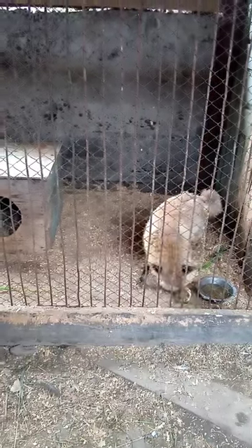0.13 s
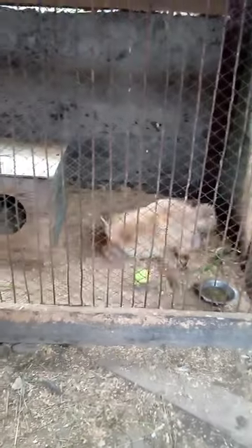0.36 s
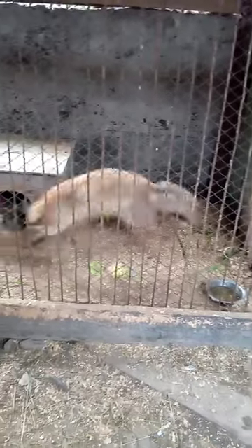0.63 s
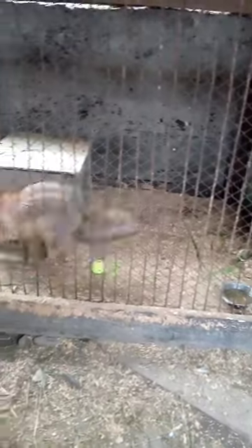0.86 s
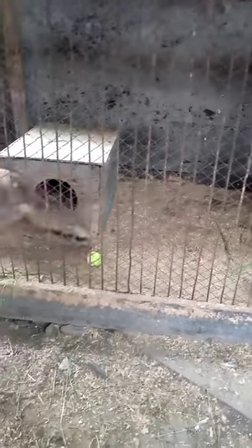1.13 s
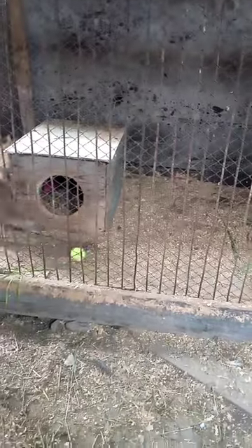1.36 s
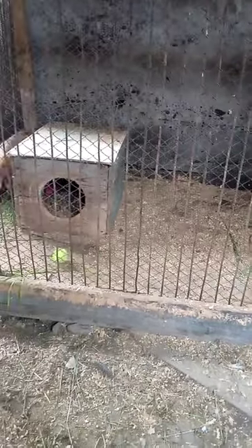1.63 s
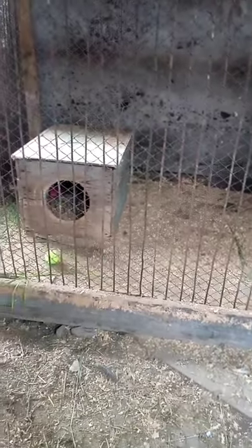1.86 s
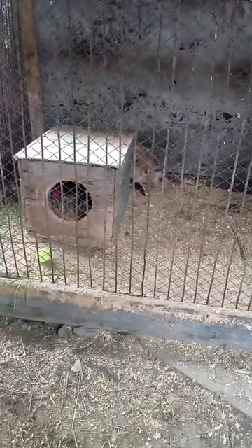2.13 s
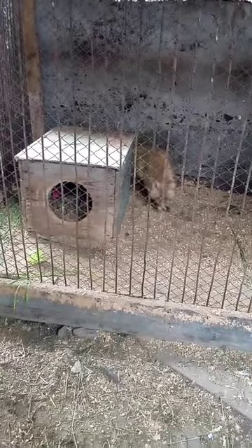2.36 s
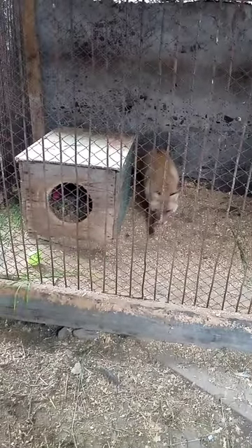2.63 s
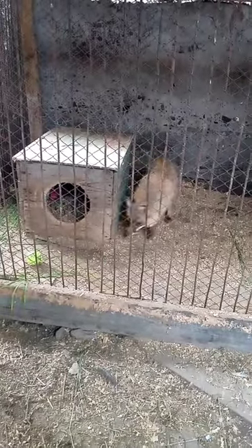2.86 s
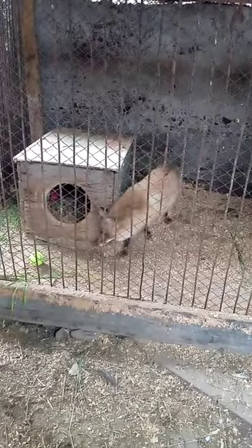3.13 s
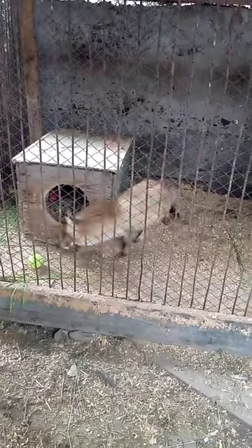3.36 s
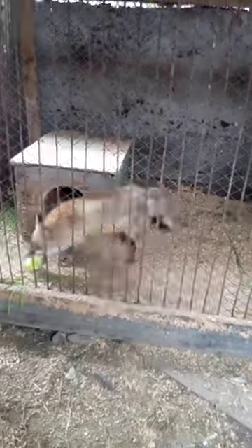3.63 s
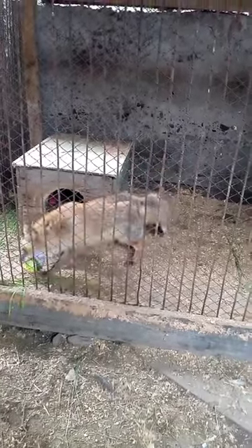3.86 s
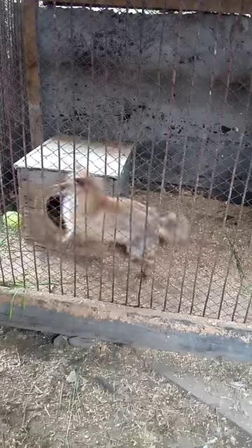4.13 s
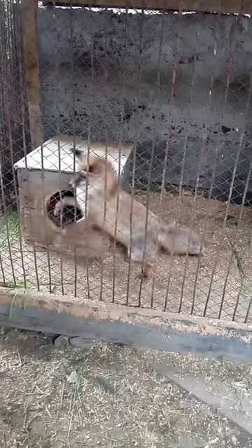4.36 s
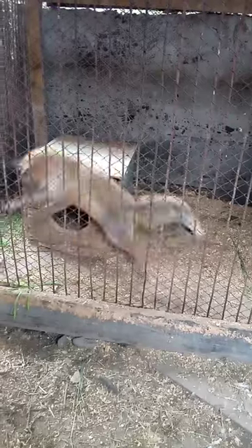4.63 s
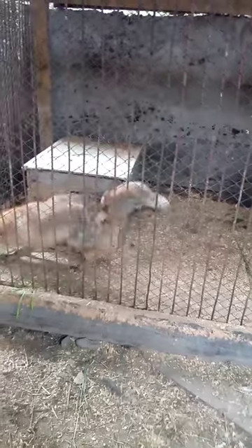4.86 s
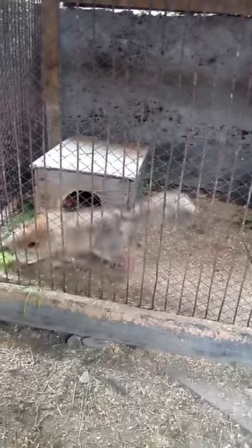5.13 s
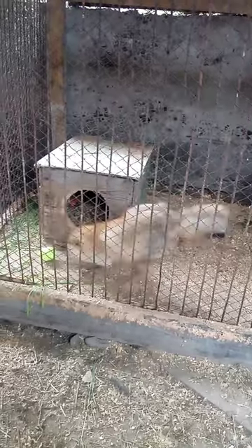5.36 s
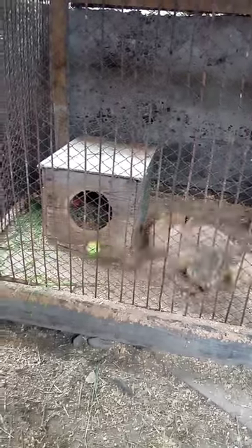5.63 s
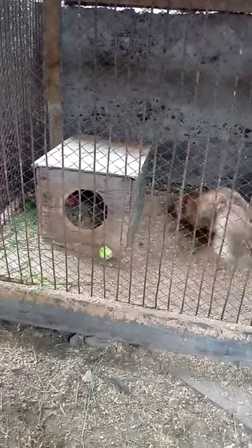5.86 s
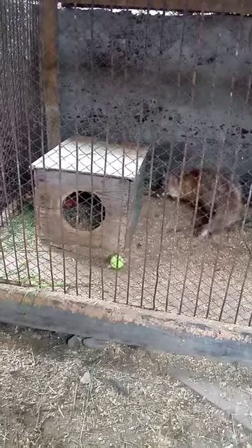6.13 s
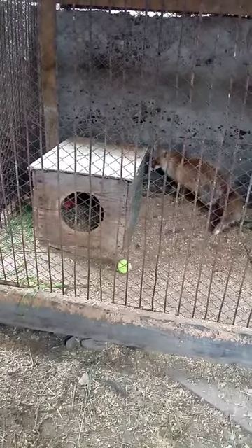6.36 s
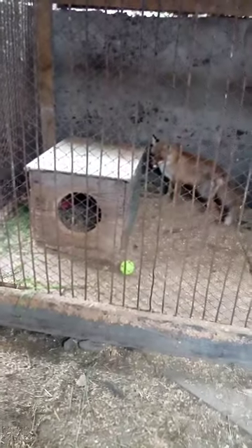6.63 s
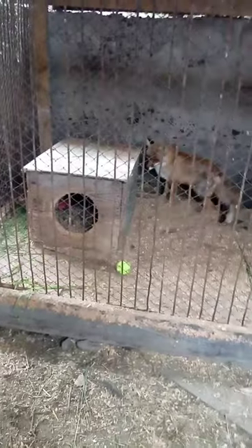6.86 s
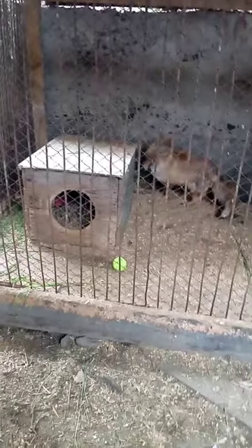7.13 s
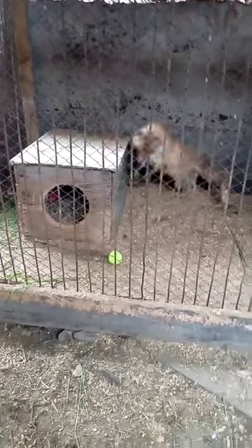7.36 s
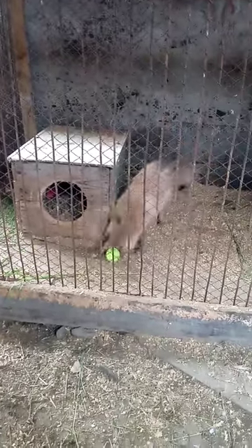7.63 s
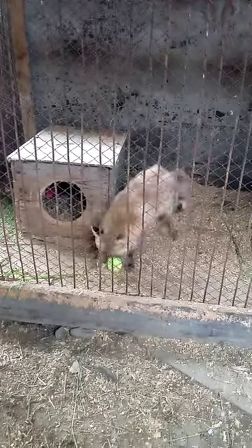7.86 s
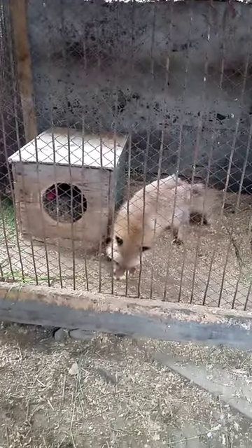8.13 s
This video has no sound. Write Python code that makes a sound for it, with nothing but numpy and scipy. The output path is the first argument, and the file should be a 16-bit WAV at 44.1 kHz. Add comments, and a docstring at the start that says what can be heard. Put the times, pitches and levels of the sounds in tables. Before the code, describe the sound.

Irregular flurries of padded paw thuds, crisp claw scrapes and cracking straw as a fox bats a small ball about its wire pen.

```python
"""Fox pouncing on a hollow floor

A fox scuffles and pounces in a wire pen floored with straw-strewn planks, batting a small ball.
Landings and sliding paws ring plank modes; claw strokes shape grains of straw and grit, which ring the wire.
Knocks ring the ball's modes, stalks crack in clicks, and one faint squeak is a rough, sagging sine.
Short feedback delays make the pen; noise makes a faint hiss, and a narrow noise-fed resonance the hum."""
import sys
import numpy as np
from scipy import signal
from scipy.fft import rfft, irfft
from scipy.io import wavfile

SR = 44100
rng = np.random.default_rng(int(sys.argv[2]) if len(sys.argv) > 2 else 0)


def put_to_file(sound):
    """Save the sound as 16-bit audio at rate SR, in the file named by the first command-line argument."""
    columns = np.atleast_2d(sound).T  # one column per channel
    safe = np.clip(columns, -1, 1)
    whole_steps = np.round(safe * 32767)
    wavfile.write(sys.argv[1], SR, whole_steps.astype(np.int16))


def undo_db(level):
    """Turn decibels back into plain size, where 20 dB means ten times bigger."""
    steps = np.asarray(level, float) / 20
    return 10 ** steps


N = 363825   # samples

# where the claws work: (t/s, lean to the left/dB, of which placed() applies half as left-right difference)
PLACE = [(.3, -17), (.75, 10), (1, 1), (1.2, 4), (2.2, 2), (4.5, 8.5), (5.2, 0), (5.45, -0.5), (6.1, 2.5),
         (7.28, -5), (7.6, 5)]


def rms_one(x):
    """Scale to rms 1."""
    return x / np.sqrt(np.mean(x ** 2) + 1e-20)


def at_bins(points):
    """Read a (f/Hz, value) table at every frequency bin, along log frequency."""
    hz = np.maximum(np.arange(N // 2 + 1) * SR / N, 1)
    table_hz, values = np.array(points).T
    return np.interp(np.log(hz), np.log(table_hz), values)


def colour(x, spectrum):
    """Shape by a spectrum in dB whose overall gain on white noise is 1."""
    return irfft(rfft(x) * rms_one(undo_db(at_bins(spectrum))), N)


def ring(push, hz, t60):
    """Two-pole resonator: a unit click sets a sine ringing from height 1."""
    radius = undo_db(-60 / (t60 * SR))
    turn = 2 * np.pi * hz / SR
    return signal.lfilter([0, np.sin(turn)], [1, -2 * radius * np.cos(turn), radius ** 2], push + 1e-18)


def flicker(rate, count):
    """Slow chance curves: straight lines between normal knots of spread 1, rate of them a second."""
    knots = rng.standard_normal((count, int(N / SR * rate) + 2))
    clock = np.arange(N) / SR * rate
    return np.array([np.interp(clock, np.arange(len(k)), k) for k in knots])


def grains(per_s, spread_db, smooth):
    """Random clicks of uneven size on a smooth rub; both ears share a part."""
    unevenness = np.minimum(rng.exponential(1, (3, N)), 3.5)
    sizes = undo_db(spread_db * unevenness) * rng.standard_normal((3, N))
    clicks = rms_one(sizes * (rng.random((3, N)) < per_s / SR))
    rub = clicks + smooth * rng.standard_normal((3, N))
    return rms_one(rub[0] + 1.2 * rub[1:])


def placed(s, db):
    """Left and right gains of a claw sound at time s, leaning to where the claws work."""
    return undo_db(db + np.interp(s, *np.transpose(PLACE)) * np.array([[.25], [-.25]]))


def background():
    """Gently swelling hiss, nearly independent at the two ears, and noise through a narrow mode as hum."""
    # hiss spectrum: (f/Hz, level per Hz/dB)
    hiss_colour = [(30, -5), (70, -4.5), (115, -6), (174, -13), (300, -12.5), (460, -16), (700, -17),
                   (1200, -22), (1600, -21.5), (2500, -22), (4000, -23.5), (6300, -26), (10000, -26),
                   (16000, -31.5)]
    # left-right likeness of the hiss: (f/Hz, correlation)
    likeness = [(60, 0.048), (1650, 0.016), (4970, 0.12), (15000, .02)]
    # hum: (f/Hz, width/Hz, level/dB)
    hum_mode = (144, 12.4, -63)
    mid, side = rfft(rng.standard_normal((2, N)))
    alike = np.clip(at_bins(likeness), 0, 1)
    pair = np.sqrt(1 + alike) * mid + np.sqrt(1 - alike) * side * [[1], [-1]]
    hiss = rms_one(colour(irfft(pair, N), hiss_colour))
    swell = undo_db(0.73 * flicker(rate=2.916, count=1))
    hz, width_hz, hum_db = hum_mode
    hum = ring(rng.standard_normal(N), hz, np.log(1000) / np.pi / width_hz)
    return undo_db(-56.5) * hiss * swell + undo_db(hum_db) * rms_one(hum)


def slides():
    """Paws slide under load: each sets in, holds and lets go. Returns plank, straw and grit drive in dB."""
    # slides: (t/s, length/s, weight on planks level/dB, straw dragged level/dB, grit scraped level/dB)
    slide_list = [(0.388, 0.027, -39.5, -66, -52.5), (0.527, 0.038, -45, -51.5, -88),
                  (0.7, 0.026, -36.5, -48, -38.5), (0.753, 0.031, -35.5, -49, -50.5),
                  (0.901, 0.026, -32, -62, -51.5), (0.975, 0.013, -30, -35, -34),
                  (1.074, 0.23, -47.5, -74, -50.5), (1.209, 0.036, -48, -43.5, -40.5),
                  (1.297, 0.072, -36.5, -47.5, -45), (1.454, 0.021, -48, -69, -54.5),
                  (1.702, 0.14, -56, -59, -55.5), (2.132, 0.07, -53, -70, -61),
                  (2.15, 0.022, -28.5, -49, -62), (2.21, 0.11, -46.5, -56, -52),
                  (4.097, 0.047, -51, -60, -50), (4.402, 0.047, -60, -43, -45.5),
                  (4.47, 0.2, -54, -74, -48.5), (4.707, 0.14, -42, -44.5, -57),
                  (4.775, 0.12, -31, -40.5, -38.5), (4.906, 0.084, -42, -48, -49),
                  (5.038, 0.062, -46, -72, -50), (5.083, 0.029, -28, -51, -50),
                  (5.133, 0.074, -50, -39.5, -42), (5.227, 0.12, -60, -46.5, -45.5),
                  (5.353, 0.11, -41, -44.5, -39), (5.435, 0.16, -33, -37.5, -40),
                  (5.562, 0.077, -41, -45, -43.5), (5.628, 0.088, -45, -49, -43.5),
                  (5.71, 0.058, -51, -46.5, -45), (5.801, 0.054, -30.5, -37.5, -46),
                  (5.905, 0.067, -42, -59, -52), (5.957, 0.06, -35.5, -51, -60),
                  (6.082, 0.059, -36, -65, -69), (6.15, 0.23, -54.5, -66, -70), (7.287, 0.2, -70, -64, -68),
                  (7.606, 0.066, -27, -51.5, -67), (7.894, 0.045, -55, -71, -62.5)]
    # swing of the stirring: planks/dB, straw/dB, grit/dB
    stir_swing_db = (2.5, 3.5, 3.5)
    attack_s, release_db_per_s = 0.02, 274
    t = np.arange(N // 32 + 2) * 32 / SR   # a coarse clock is enough
    swing = np.pad(flicker(rate=11.0, count=3)[:, ::32], ((0, 0), (0, 1)), "edge")[:, :len(t)]
    # faint, uneven stirring between the moves
    stir_db = np.array([[-67], [-64.5], [-66]]) + np.array(stir_swing_db)[:, None] * swing
    power = undo_db(2 * stir_db)
    for s, length, *levels_db in slide_list:
        attack = np.clip((t - s) / attack_s, 0, 1) ** 2
        release = undo_db(-release_db_per_s * np.maximum(t - s - length, 0))
        power += (undo_db(levels_db)[:, None] * attack * release) ** 2
    return [np.interp(np.arange(N) / SR, t, 10 * np.log10(p)) for p in power]


def planks(weight_db):
    """A padded landing presses unevenly for a moment; plank modes near the spot's pitch ring most."""
    # paws landing: (t/s, level/dB, favoured pitch f/Hz, dying time constant of the press/s)
    thuds = [(0.308, -46.5, 117, 0.067), (0.424, -25.5, 135, 0.03), (0.435, -42.5, 298, .02),
             (0.543, -33.5, 133, 0.044), (0.553, -39, 294, 0.019), (0.735, -36.5, 147, 0.017),
             (0.77, -26, 134, 0.018), (0.914, -39, 148, 0.017), (1.194, -42.5, 224, 0.043),
             (1.233, -35.5, 214, 0.019), (1.303, -28, 201, 0.038), (1.477, -42.5, 183, 0.017),
             (1.679, -47.5, 222, 0.031), (1.746, -43.5, 131, 0.042), (1.896, -36.5, 210, 0.019),
             (2.109, -35.5, 172, 0.01), (2.179, -32, 158, 0.011), (2.192, -40.5, 320, 0.051),
             (2.29, -59, 88.8, 0.017), (2.381, -47, 105, 0.039), (2.582, -49.5, 121, 0.02),
             (2.664, -48.5, 110, 0.027), (3.56, -52, 142, 0.016), (4.098, -44, 248, 0.029),
             (4.128, -34, 98, 0.028), (4.229, -47.5, 102, 0.017), (4.428, -27.5, 144, 0.077),
             (4.704, -25, 124, 0.054), (4.799, -31.5, 215, 0.049), (4.808, -37, 372, 0.007),
             (4.866, -31, 195, 0.015), (4.906, -26, 127, 0.036), (5.083, -37.5, 215, 0.068),
             (5.275, -43.5, 172, 0.11), (5.455, -34.5, 135, 0.031), (5.571, -32.5, 172, 0.044),
             (5.71, -29.5, 179, 0.051), (5.782, -34.5, 286, 0.068), (5.971, -32.5, 278, 0.014),
             (6.072, -33, 202, 0.021), (7.338, -49, 98, 0.049), (7.603, -26, 171, 0.046),
             (7.911, -40.5, 120, 0.045), (7.989, -45.5, 109, 0.019), (8.199, -51, 117, 0.031)]
    # plank modes: (f/Hz, level/dB, t60/s)
    plank_modes = [(61, -11, 0.54), (85.3, -4, 0.64), (110, 0, 0.37), (135, 0, 0.33), (151.9, -0.5, 0.24),
                   (172, -0.5, 0.26), (204.2, 3, 0.16), (231.5, 0.5, 0.12), (274, 1, 0.13),
                   (302.5, 1.5, 0.13), (339, 2, 0.13), (381.3, -3, 0.14), (444, -42, 0.42),
                   (508.5, -7, 0.17), (680, -8.5, 0.083)]
    focus_db = 13   # modes an octave off the spot's pitch are this much weaker
    out = np.zeros(N)
    jolts = rng.choice([-1, 1], (len(thuds), 40 + len(plank_modes)))
    shuffle = undo_db(weight_db - 47.5) * rng.standard_normal(N)
    lag = np.arange(40) * .0037   # s between jolts of one landing
    for k, (hz, level_db, t60) in enumerate(plank_modes):
        push = shuffle * undo_db(level_db)
        for (s, db, spot_hz, press), jolt in zip(thuds, jolts):
            at = np.minimum(((s + lag) * SR).astype(int), N - 1)
            strength = np.where(lag > 0, 0.46 * jolt[:40], 0.75) * np.exp(-lag / max(press, .002))
            strength = strength * jolt[40 + k]   # each spot starts a mode up or down
            off_pitch = np.log2(hz / spot_hz) ** 2
            push[at] += strength * undo_db(db + level_db - 8.0 - focus_db * off_pitch)
        out += ring(push, hz, t60)
    soft_pads = signal.butter(2, 800.0, fs=SR, output="sos")
    return signal.sosfilt(soft_pads, out)


def stroke(s, db, dying):
    """A claw bites, then drags: its span, clock, first bite and dying drag, the last two at both ears."""
    at = round(s * SR)
    t = np.arange(min(SR // 3, N - at)) / SR
    side = placed(s, db - 14.0)
    t60 = max(dying, .01)
    bite = 1.9 * (0.071 / t60) ** 0.21   # the shorter the stroke, the harder its first bite
    snap = bite * undo_db(-60 * t / 0.023) * (1 - np.exp(-t / 0.00085))
    drag = undo_db(-60 * t / t60) * (1 - np.exp(-t / 0.025 / t60))   # swells over a share of its dying time
    return slice(at, at + len(t)), t, side * snap, side * drag


def claws(straw_db, grit_db):
    """Claw strokes shape straw and banded grit in their own colours; dragging fills gaps; grit rings wire."""
    # claw strokes: (t/s, level/dB, dull part relative level/dB, grain pitch f/Hz, dying time t60/s)
    rakes = [(0.3006, -42.5, 8, 1550, 0.054), (0.5464, -49, -5, 1720, 0.074),
             (.7196, -49.5, -21, 2250, 0.022), (0.775, -37, -20, 2450, 0.051),
             (.9237, -37.5, -17, 3300, 0.091), (0.956, -37.5, -6, 3340, 0.2),
             (0.981, -31.5, -22, 1870, 0.02), (1.065, -36, -20, 3400, 0.055), (1.101, -44, -6, 2130, 0.074),
             (1.202, -31.5, -27, 2970, 0.044), (1.222, -31.5, -17, 2920, 0.09),
             (1.282, -31, -23, 3030, 0.15), (1.295, -25.5, -5, 2950, 0.035), (1.8936, -49, -9, 3220, 0.11),
             (2.172, -35, -3.5, 2370, 0.28), (2.2883, -45.5, 9, 1800, 0.13), (2.7, -54, -21, 2000, .12),
             (4.0545, -40.5, -5, 2960, 0.26), (4.0984, -50, -17, 3620, 0.2),
             (4.427, -35.5, -6, 5750, 0.038), (4.513, -40.5, 6, 2830, 0.58), (4.555, -24, -36, 5040, 0.1),
             (4.7015, -30, -27, 5960, 0.0083), (4.785, -32, -4, 3120, 0.043),
             (4.8, -24.5, -12, 2400, 0.012), (4.8638, -25, -4, 3620, 0.077), (5.089, -29, 3, 2800, 0.13),
             (5.153, -23.5, -19, 2780, 0.044), (5.263, -33.5, -6, 2940, 0.085),
             (5.346, -31.5, -16, 3520, 0.31), (5.371, -30, -27, 3120, 0.063), (5.4298, -23, -33, 2170, 0.1),
             (5.441, -32, -27, 4400, .04), (5.4582, -36, -3, 3120, 0.054), (5.488, -22.5, -2, 1890, 0.054),
             (5.506, -30, -1, 5100, 0.035), (5.524, -31, 3, 1980, 0.032), (5.552, -28.5, -17, 2900, 0.14),
             (5.562, -23, -17, 2500, 0.061), (5.595, -36, -9, 3230, 0.11), (5.7394, -33.5, -12, 2960, 0.16),
             (5.775, -30.5, -11, 2800, 0.22), (5.795, -26.5, -11, 1690, 0.18), (5.82, -39, -12, 2210, .05),
             (5.829, -40, -6, 1550, 0.29), (5.968, -43.5, 0, 3140, 0.19), (6.0695, -29, 0, 3570, 0.23),
             (6.1, -33.5, -1, 3400, 0.053), (6.3, -49, -15, 3300, 0.17), (7.178, -43, -15, 1900, 0.21),
             (7.278, -36.5, -6.5, 6100, 0.13), (7.602, -34, -2, 2000, 0.64),
             (7.628, -47.5, -10, 5000, 0.13)]
    # fine grit kicked up, a bright spray: (t/s, level/dB, dying time t60/s)
    sprays = [(0.719, -43, 0.092), (.9815, -46.5, 0.15), (1.282, -42, 0.068), (1.296, -41, .045),
              (4.8646, -38, 0.06), (5.349, -44.5, 0.43), (5.4294, -50, 0.18), (5.555, -53, 0.47),
              (5.7813, -49, .2), (7.28, -44, 0.06)]
    # centres of the overlapping grit bands: f/Hz
    bands_hz = [1400, 2100, 3200, 4800, 7200, 11000]
    # grit spectrum: (f/Hz, level per Hz/dB)
    grit_colour = [(900, -10), (1300, -44), (1500, 0), (2050, 1), (2400, 0), (2900, 2), (3350, 6.5),
                   (3900, 3.5), (4600, 1.5), (5100, -2), (5700, 7.5), (6600, 2), (8000, -1), (10000, -17.5),
                   (13000, -19), (15000, -27)]
    # straw spectrum: (f/Hz, level per Hz/dB)
    straw_colour = [(250, -1.5), (400, 2), (600, 2), (845, -1), (950, -1.5), (1130, -0.5), (1400, -10),
                    (2000, -10), (3000, -29.5)]
    # stereo lean of the grit: (f/Hz, left-right/dB)
    grit_lean = [(60, -2), (150, -7), (380, 12), (950, -3), (2380, 9), (5980, 5.5), (15000, -10)]
    # wire mesh peppered by grit: (f/Hz, level/dB, t60/s)
    wire_modes = [(1759, -38, 0.015), (2097, -36.5, 0.012), (2495, -35, 0.01), (2940, -33, 0.014),
                  (3347, -35.5, 0.011), (5740, -40, .01)]
    top_gain = undo_db(31.5)   # the top band is weak in grit and microphone, so it is driven harder
    sheen = undo_db(-41)       # share of every stroke that reaches the top band
    centres = np.array(bands_hz)[:, None, None]
    patches = undo_db(4.9 * flicker(rate=60, count=len(bands_hz) + 1))[:, None]
    bright = undo_db([grit_db - 9.5] * 2) * patches[1:]
    dull = undo_db([straw_db - 7.5] * 2) * patches[0]
    strokes, ticks = np.array(rakes), np.zeros((2, N))
    # dragging keeps the colour of the strokes around it
    drag_hz = np.interp(np.arange(N) / SR, strokes[:, 0], strokes[:, 3])
    bright *= undo_db(2 - 2 * np.log2(centres / drag_hz) ** 2)
    for s, db, dying in sprays:
        span, t, snap, drag = stroke(s, db, dying)
        bright[-1, :, span] += (0.23 * snap + drag) * top_gain
    for s, db, dull_db, grain_hz, dying in rakes:
        span, t, snap, drag = stroke(s, db, dying)
        off_pitch = np.log2(centres / grain_hz) ** 2
        # the snap is broader in colour than the drag
        bright[..., span] += snap * undo_db(-4 * off_pitch) + drag * undo_db(4 - 7 * off_pitch)
        bright[-1, :, span] += (.3 * snap + drag) * sheen * top_gain
        ticks[:, span] += 1.16 * snap * np.sin(2 * np.pi * grain_hz * t)   # the claw tip rings briefly
        dull[:, span] += (0.5 * snap + drag) * undo_db(dull_db)
    rub, spectrum = grains(per_s=900.0, spread_db=1.0, smooth=0.95), 0
    for k, envelope in enumerate(bright):
        # overlapping bands that add up to one, each with a differently shifted run of grains
        share = at_bins(np.transpose([bands_hz, np.arange(len(bands_hz)) == k]))
        spectrum = spectrum + rfft(envelope * np.roll(rub, k * SR, axis=1)) * share
    leaning = irfft(spectrum * undo_db(at_bins(grit_lean) * [[.5], [-.5]]), N)
    grit = colour(leaning, grit_colour)
    hits = undo_db(2.5 * flicker(rate=25, count=len(wire_modes)))   # each wire is hit now more, now less
    wire = sum(undo_db(db) * ring(grit * hit, hz, t60) for (hz, db, t60), hit in zip(wire_modes, hits))
    straw = colour(dull * grains(per_s=600.0, spread_db=1.5, smooth=1.0), straw_colour)
    return ticks + grit + wire + straw


def pen(x):
    """Eight feedback delays a side off the walls, duller on every round."""
    t60_s, cut_hz = 0.27, 5200
    out = [0, 0]
    z = np.exp(-2j * np.pi * np.arange(N // 2 + 1) / N)   # one sample of delay
    dull = np.exp(-2 * np.pi * cut_hz / SR)
    for k, lag in enumerate((rng.uniform(0.0054, .02, 16) * SR).astype(int)):
        loop = undo_db(-60 * lag / SR / t60_s) * (1 - dull) / (1 - dull * z) * z ** lag
        out[k % 2] = out[k % 2] + loop / (1 - loop) * (-1) ** (k // 2)
    return irfft(rfft(x) * np.array(out), N)


def ball():
    """The hollow ball's modes ring briefly under a dying run of contacts, most near the blow's pitch."""
    # the ball struck: (t/s, level/dB, favoured pitch f/Hz, dying time constant of the contacts/s)
    knocks = [(0.302, -50, 1150, .003), (0.98, -33.5, 1150, 0.024), (1.238, -40, 700, 0.017),
              (1.295, -28, 1090, 0.0047), (4.429, -30, 785, 0.0061), (4.703, -26.5, 1270, 0.0027),
              (4.79, -31.5, 705, 0.018), (4.865, -40, 594, .005), (5.151, -29.5, 1030, 0.0033),
              (5.487, -30, 950, 0.026), (5.736, -41.5, 835, .02), (5.784, -28, 860, 0.02),
              (5.826, -26.5, 800, 0.016), (5.857, -34.5, 800, 0.034), (5.976, -29.5, 560, 0.0058),
              (5.98, -40, 900, 0.0045), (7.054, -40, 540, 0.0033), (7.604, -32, 640, 0.0069)]
    # ball modes: (f/Hz, level/dB, t60/s)
    ball_modes = [(478, 3, 0.03), (640, -2, .03), (706.4, -3, 0.04), (790, -4, .03), (846, -3, 0.055),
                  (940, -4, 0.04), (1060, 0, .022), (1137, 1, 0.04), (1230, 1.5, 0.03)]
    focus_db = 42   # modes an octave off the blow's pitch are this much weaker
    felt = np.hanning(24) * 2 / 24   # the felt softens each contact
    out = np.zeros(N)
    chance = rng.standard_normal((len(knocks), len(ball_modes), 30))
    lag = np.arange(30) * .0017   # s between contacts of one blow
    for k, (hz, level_db, t60) in enumerate(ball_modes):
        push = np.zeros(N + SR)
        for (s, db, blow_hz, contact), jolt in zip(knocks, chance[:, k]):
            strength = np.where(lag > 0, 1.5 * jolt, 1) * np.exp(-lag / max(contact, .001))
            off_pitch = np.log2(hz / blow_hz) ** 2
            push[((s + lag) * SR).astype(int)] += strength * undo_db(db + level_db - 13.0 - focus_db * off_pitch)
        out += ring(np.convolve(push[:N], felt)[:N], hz, t60)
    return out


def cracks():
    """Dry stalks crack under a paw: each a quick dying run of splinter clicks, broad in colour."""
    # cracks: (t/s, level/dB)
    crack_list = [(0.719, -32), (1.1896, -37), (1.195, -32), (1.2032, -40), (1.2225, -51), (4.428, -38),
                  (1.283, -36), (1.296, -27), (4.5556, -35), (4.703, -30), (4.7877, -31), (4.8024, -21),
                  (4.866, -22), (5.0977, -26.5), (5.1535, -20), (5.374, -33), (5.4315, -29), (5.459, -30),
                  (5.488, -28), (5.743, -35), (5.784, -36), (5.984, -40)]
    low_hz, high_hz, dying_s = 1200, 6360, 0.0024
    out, lag = np.zeros((2, N)), np.arange(12) * 17   # samples
    for (s, db), jolt in zip(crack_list, rng.standard_normal((len(crack_list), 2, len(lag)))):
        splinters = np.where(lag > 0, jolt, -1) * np.exp(-lag / SR / dying_s)
        out[:, round(s * SR) + lag] += placed(s, db + 8.0) * splinters
    return signal.sosfilt(signal.butter(2, [low_hz, high_hz], "band", fs=SR, output="sos"), out)


def squeak():
    """One faint, short, high squeak: a sine roughened by chance that sags in pitch."""
    # squeak: (t/s, level/dB, starting f/Hz, swell/s)
    squeak_at = (6.936, -53, 3180, .008)
    s, db, hz, swell = squeak_at
    t = np.maximum(np.arange(N) / SR - s, 0)
    wobble = 1 + 1.2 * flicker(rate=500, count=1)[0]
    phase = 2 * np.pi * hz * t * (1 - .5 * np.minimum(t, .1))
    envelope = t / swell * np.exp(1 - t / swell)
    return undo_db(db) * wobble * np.sin(phase) * envelope


def scene():
    """All sources in the pen, the floor leaning to one side by frequency."""
    # stereo lean of the planks: (f/Hz, left-right/dB)
    plank_lean = [(120, -0.5), (250, 2), (500, 6.5)]
    weight_db, straw_db, grit_db = slides()
    struck = ball() + squeak() + cracks() + claws(straw_db, grit_db)
    floor = planks(weight_db)
    leaning = irfft(rfft(floor) * undo_db(at_bins(plank_lean) * [[.5], [-.5]]), N)
    echoes = undo_db(-28.0) * pen(floor) + undo_db(-16) * pen(struck)
    return leaning + struck + echoes + background()


def low_pass(x):
    """Removes everything above the highest recorded frequency."""
    return signal.sosfilt(signal.butter(12, 16890, fs=SR, output="sos"), x)


def record(dry):
    """Microphone colour, with the left port a little ahead of the right."""
    # microphone response: (f/Hz, level/dB)
    microphone = [(20, -21), (45, -8), (75, 1), (6300, 0.5), (7300, -10.5), (13600, -9.5), (14500, -1.5),
                  (15400, 9), (15800, -16), (16100, -43)]
    left_lag_s, lag_top_hz = -0.000042, 6100   # above the top the phase between the ports stops growing
    hz = np.arange(N // 2 + 1) * SR / N
    lag = np.exp(-2j * np.pi * np.minimum(hz, lag_top_hz) * left_lag_s * np.array([[1], [0]]))
    mix = irfft(rfft(dry) * undo_db(at_bins(microphone)) * lag, N)
    return low_pass(mix)


dry = scene()
out = record(dry)
put_to_file(out)
```